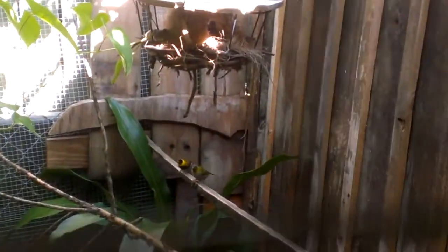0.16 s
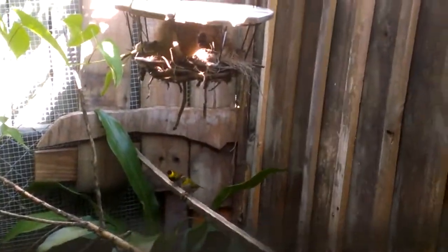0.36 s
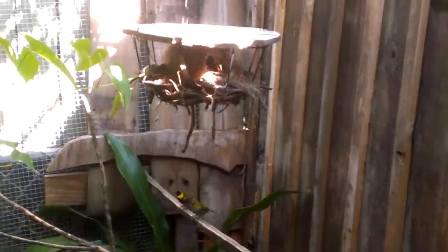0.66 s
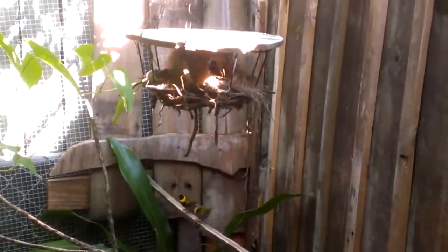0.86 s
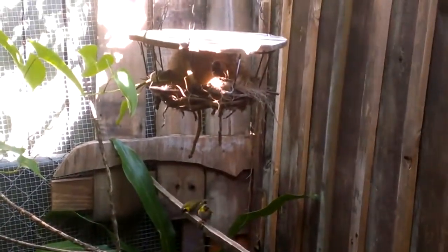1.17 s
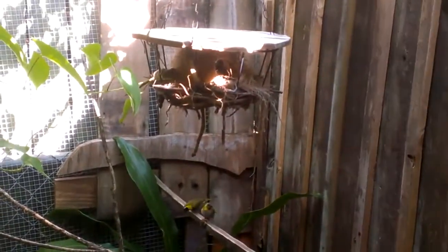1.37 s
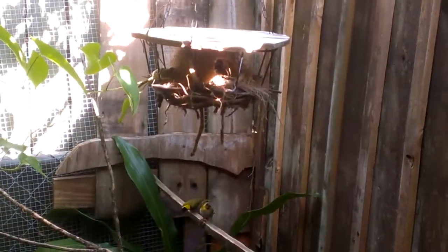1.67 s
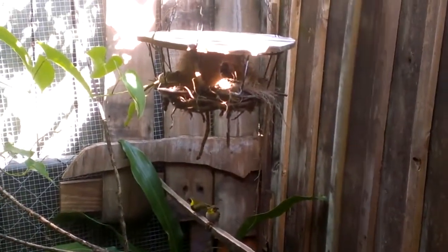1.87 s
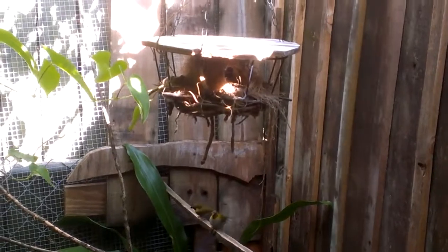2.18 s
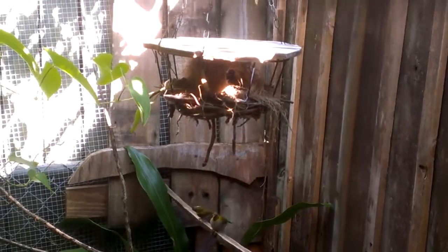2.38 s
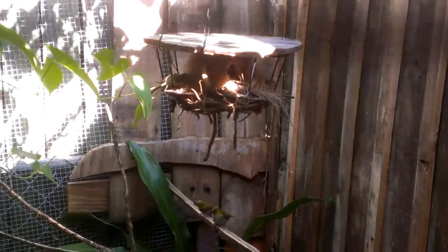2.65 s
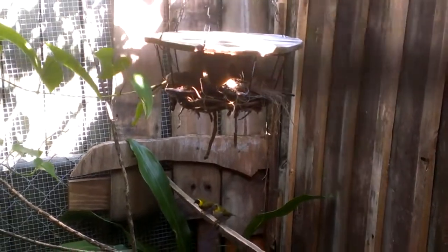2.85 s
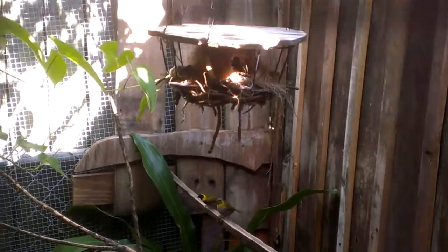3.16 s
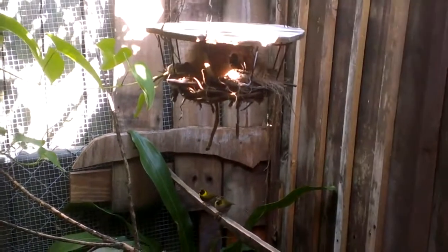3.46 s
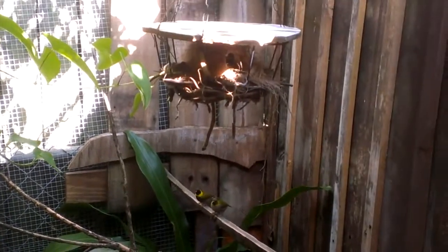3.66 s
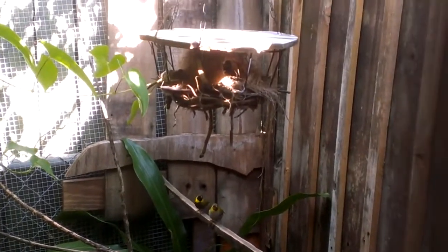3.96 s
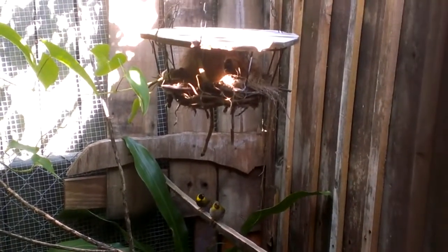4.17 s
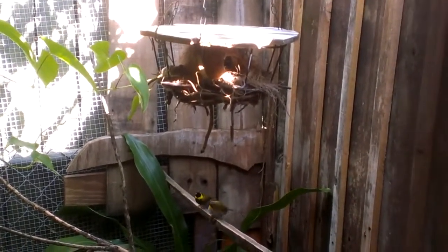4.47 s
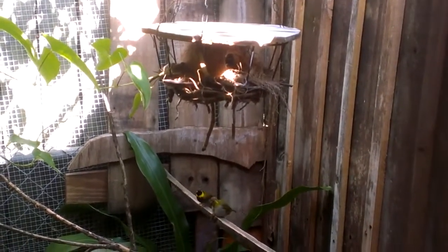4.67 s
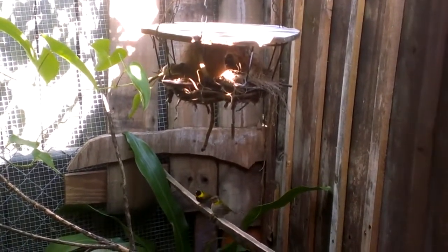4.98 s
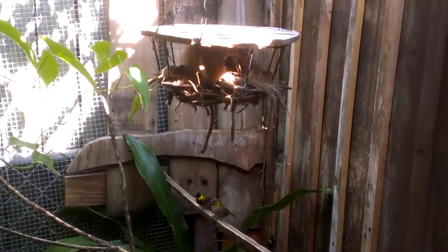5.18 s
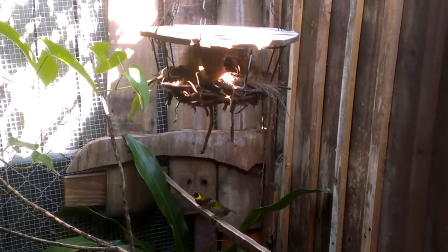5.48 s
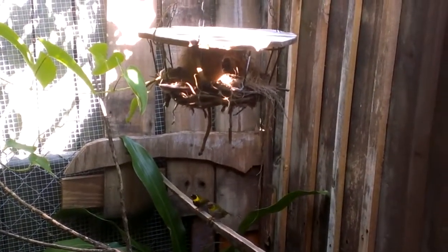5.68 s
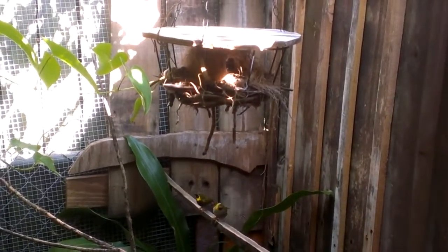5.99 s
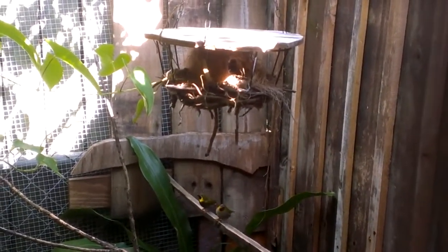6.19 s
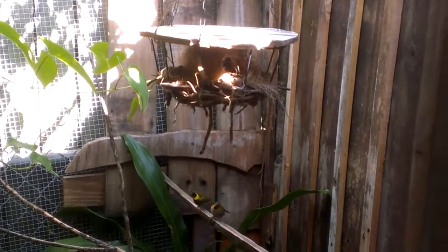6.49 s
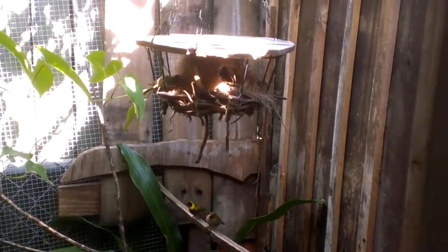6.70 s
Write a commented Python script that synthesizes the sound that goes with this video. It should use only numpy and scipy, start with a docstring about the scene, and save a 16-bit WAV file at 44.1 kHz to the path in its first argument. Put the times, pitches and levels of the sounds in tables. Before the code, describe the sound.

Short bright bird twitters with brief gaps, echoing off nearby planks, with soft rumble, faint hiss and a late dry rustle.

```python
"""In a wooden aviary two small finches twitter, trading short phrases of chips, buzzy rasps and thin whistles.
Each note is a gliding whistle shaken into a buzz, with a faint second voice from the other side of the syrinx
(a bird's voice box). Notes overlap, and plank walls close by answer each one with noisy, fading echoes.
Behind them are a low outdoor rumble, wash and hiss made of shaped noise, a faint wavering hum,
a distant bird of soft falling tones and a few dry brushes of feathers and twigs."""
import sys
import numpy as np
from scipy import signal
from scipy.fft import rfft, irfft, next_fast_len
from scipy.io import wavfile
from scipy.ndimage import map_coordinates

SR = 44100
rng = np.random.default_rng(int(sys.argv[2]) if len(sys.argv) > 2 else 0)


def wav_out(sig):
    """Save sig, one row per channel (or a flat mono array), as 16-bit PCM at SR to the path in sys.argv[1]."""
    wavfile.write(sys.argv[1], SR, np.round(np.clip(np.atleast_2d(sig).T, -1, 1) * 32767).astype(np.int16))


N = 301644  # length of the scene in samples

# How each kind of note moves from start to end, by name of note:
# share of its length, f/Hz, relative level/dB, buzz (0 clear, 1 full, a little more is possible)
NOTE_SHAPES = { "chip": [(0, 8400, -14, 0.7), (.09, 7730, 2, 0.9), (.2, 6510, -7.5, 1.14),
               (.4, 6963, -8.5, 0.9), (.8, 6926, -0.5, 0.6), (1, 6890, -9.5, 0.8)],
               "chirt": [(0, 8500, 3, 0.4), (.2, 6990, -4.5, .9), (.55, 7040, -4.5, 0.8),
               (.85, 7300, -1.5, .6), (1, 7240, -8, .7)], "flick": [(0, 8200, -11, 0.5),
               (.3, 7420, -3, 0.97), (.65, 6850, -3, 1.09), (1, 6500, -7.5, 1)], "pip": [(0, 6200, -2, .2),
               (.25, 6940, -3.5, 0), (.85, 6560, 2, 0), (1, 6550, -15, .1)], "arch": [(0, 8800, -12, .4),
               (.3, 9400, -2, .35), (.55, 8800, -8, .4), (.75, 8000, 0, .7), (1, 8050, 6, 0.96)],
               "peep": [(0, 8500, -6, .25), (.25, 8280, 0, .06), (.8, 8190, -1, .03), (1, 8140, -7, .04)],
               "slur": [(0, 8800, -3, .2), (.2, 7870, 0.5, 0.3), (.45, 7750, -2, 0.7),
               (1, 7520, -7.5, 0.44)], "coo": [(0, 6900, 1, 1.1), (.25, 6200, -7, .3),
               (.6, 6260, -2.5, .08), (.88, 6360, 2, .04), (1, 6220, -8, .15)],
               "whistle": [(0, 6750, -6, .4), (.12, 7140, -2, .12), (.3, 7065, 0, .02), (.7, 7030, 0, .01),
               (.92, 7070, 0, .01), (1, 7060, -5, .02)], "churr": [(0, 7300, -4, 0.9),
               (.35, 6900, 5.5, 0.9), (.75, 5800, -7, 1), (1, 5620, -7, 0.99)], "low": [(0, 4780, -20, .35),
               (.2, 4625, -3, .02), (.48, 4550, 0, 0), (.8, 4590, 0, 0), (.95, 4630, -1, 0),
               (1, 4670, -5, .03)], "long": [(0, 8080, -4, .03), (.2, 7890, -5.5, .02), (.5, 7790, 0, .04),
               (.78, 7750, 3, .12), (.92, 7470, 2.5, .03), (1, 7600, -8.5, .1)],
               "under": [(0, 5290, -18, .04), (.3, 5290, -4, .05), (.65, 5260, -1, .07),
               (.88, 5230, -3.5, .04), (1, 5270, -15.5, .02)], "rasp": [(0, 4300, -12, .8),
               (.1, 4900, -.5, 0.4), (.28, 5150, 3, .6), (.55, 4720, 3.5, 0.5), (.76, 4350, 2, .7),
               (.83, 4000, -1, 1.1), (.865, 2750, -5.5, 1.1), (.9, 3716, -4, 1.1), (.935, 2250, -8, 0.6),
               (1, 1950, -12, 0.1)], "tsk": [(0, 8500, -13.5, 1.3), (.3, 7650, 1, 1.2),
               (.55, 6400, -1, 1.4), (.75, 4950, -4, .5), (1, 4750, -6, .3)], "seep": [(0, 7800, -4.5, .15),
               (.4, 7270, -7.5, 0.3), (.85, 7020, -5.5, .1), (1, 7200, -14.5, 0)], }


def amp(db):
    """Turn decibels into a plain factor."""
    return 10 ** (np.asarray(db) / 20)


def unit(x):
    """Scale to an rms (average strength) of 1."""
    return x / np.sqrt(np.mean(x ** 2) + 1e-20)


def along(points, hz):
    """Read a curve of (f/Hz, value) points on a log frequency axis."""
    f, values = np.transpose(points)
    return np.interp(np.log(hz + 1), np.log(f + 1), values)


def wobble(rate, size):
    """A smooth random curve through rate random points a second."""
    knots = rng.standard_normal(1024)
    return map_coordinates(knots, [np.arange(size) * rate / SR], mode="wrap")


def filtered(x, response):
    """Strengthen or weaken each frequency of x by response(hz)."""
    padded = next_fast_len(N + SR // 2)
    hz = np.fft.rfftfreq(padded, 1 / SR)
    return irfft(rfft(x, padded) * response(hz), padded)[..., :N]


def add(track, s, sound):
    """Mix a sound into the track at s seconds, cutting it where the track ends."""
    start = max(0, round(s * SR))
    part = track[..., start:start + sound.shape[-1]]
    part += sound[..., :part.shape[-1]]


def rush(spectrum):
    """Stereo noise of rms 1 with the given spectrum, nearly mono in the bass and wide in the treble."""
    # How alike left and right are: f/Hz, likeness (1 is the same)
    likeness = [(60, 1), (160, 0.98), (350, .9), (700, 0.69), (1500, 0.33), (6000, 0.17)]

    def mid_and_side(hz):
        # This angle shares the energy between what both sides have in common and what differs.
        turn = np.arccos(np.clip(along(likeness, hz), -1, 1)) / 2
        return amp(along(spectrum, hz)) * [np.cos(turn), np.sin(turn)]

    mid, side = filtered(rng.standard_normal((2, N)), mid_and_side)
    return unit(np.array([mid + side, mid - side]))


def echoes(t60, gap):
    """A noisy stereo tail of energy 1: it builds up over gap seconds and falls by 60 dB in t60 seconds."""
    t = np.arange(SR // 3) / SR
    decay = amp(-60 * t / t60)
    build_up = 1 - np.exp(-(t / gap) ** 2)
    tail = rng.standard_normal((2, len(t))) * decay * build_up
    return tail / np.linalg.norm(tail, axis=1, keepdims=True)


def song_notes():
    """List every note sung (note, t/s, length/s, level/dB, left-right/dB, effort/dB); buzzes need more effort."""
    # Single calls and scraps of song: note, t/s, length/s, level/dB, left-right/dB
    lone_notes = [ ("chip", 0, .019, -21.5, 1.7), ("chip", .299, .026, -21, 1),
                  ("seep", .507, .018, -35, -1.3), ("chip", 1.161, .029, -28.5, -2.4),
                  ("tsk", 1.744, .013, -29, 1), ("chip", 2.521, .026, -22.5, 2.4),
                  ("chip", 3.993, .029, -32, 0), ("flick", 4.062, .024, -44, -1),
                  ("arch", 4.066, .028, -42, -.6), ("pip", 4.082, .015, -43, -2.3),
                  ("seep", 4.812, .022, -22, .6), ("chip", 5.153, .021, -21, 1),
                  ("peep", 5.487, .042, -25.5, -11.5), ("rasp", 5.526, .12, -33.5, 1.5),
                  ("tsk", 6.258, .014, -31.5, 1), ]
    # The three phrases by name, each a fixed run of notes before stretch, effort and turn:
    # note, delay/s, length/s, level/dB, left-right/dB
    motifs = { "twirl": [("flick", 0, .022, -23.8, -.5), ("pip", .028, .016, -20.3, 1),
              ("arch", .03, .042, -32, .5), ("peep", .078, .033, -22.7, 1.5), ("rasp", .118, .12, -23, .3)],
              "lilt": [("chirt", 0, .03, -22.3, 1), ("slur", .049, .03, -26, 0),
              ("coo", .057, .041, -22, 0), ("whistle", .102, .067, -22.7, -1.2)],
              "drawl": [("tsk", 0, .017, -30.3, 1), ("chirt", .052, .028, -26.5, 2.5),
              ("churr", .087, .056, -29, 2), ("peep", .133, .028, -26, -5), ("low", .157, .102, -21.7, 3.2),
              ("long", .262, .142, -27.6, -1.3), ("under", .275, .1, -30.5, 5.5)], }
    # When the phrases are sung: phrase, t/s, effort/dB, added left-right/dB, stretch (times the usual length)
    phrases = [ ("twirl", .372, 0, 0, 1.01), ("lilt", .678, 0, -.5, .99), ("drawl", .694, 0, -1, .97),
               ("twirl", 1.244, -5.8, -1, 1.001), ("lilt", 1.553, -4.3, -2, 1.05),
               ("twirl", 2.624, -.7, .3, 1.001), ("lilt", 2.925, -.5, 0, .995),
               ("drawl", 3.077, -.3, 1.5, 1.015), ("drawl", 5.083, 0, -.5, .995),
               ("twirl", 5.263, -1.5, .7, .995), ("lilt", 5.56, 1, 2.5, .98),
               ("lilt", 5.757, -6, -3.5, 1.03), ]
    full_voice_db = -24  # a lone note below this level is sung with less effort
    clear_follows, buzz_follows = .5, .9  # dB per dB of effort: for a clear note, and added at full buzz

    notes = []
    for kind, s, length, db, pan_db in lone_notes:
        notes.append((kind, s, length, db, pan_db, min(0, db - full_voice_db)))
    for motif, start, effort_db, turn_db, stretch in phrases:
        for kind, delay, length, db, pan_db in motifs[motif]:
            buzz = np.mean(NOTE_SHAPES[kind], axis=0)[3]
            level_db = db + effort_db * (clear_follows + buzz_follows * buzz)
            notes.append((kind, start + stretch * delay, stretch * length, level_db, pan_db + turn_db, effort_db))
    return notes


def syrinx(shape, length, band_hz, buzz_hz, onset, octave_db, second_db,
           swing_hz=640, throb=.7, scatter_hz=270, breath_db=-21, interval=1.275):
    """One note: a gliding whistle whose pitch and strength a fast flutter shakes into a buzz."""
    splatter_db, splatter_width_hz = -29, 4200  # broad hiss that buzz throws around the pitch
    size = int(max(length, .005) * SR)
    t = np.arange(size) / SR
    share, *columns = np.transpose(shape)
    pitch, level_db, buzz = [np.interp(t / t[-1], np.sort(share), c) for c in columns]
    buzz = np.clip(buzz, 0, 1.5)

    flutter_hz = buzz_hz * (1 + .13 * wobble(200, size))
    flutter = 2 * np.pi * (np.cumsum(flutter_hz) / SR + rng.random())
    shake_hz = buzz * (swing_hz * np.sin(flutter) + scatter_hz * wobble(1500, size))
    shake_hz += 12 * wobble(150, size)  # even a clear note is slightly unsteady

    # The shake is a complex signal: its size is the strength, its angle moves the pitch.
    shake = np.exp(throb * buzz * np.cos(flutter) + 2j * np.pi * np.cumsum(shake_hz) / SR)
    breath = wobble(4500, size) + 1j * wobble(4100, size)
    shake += amp(breath_db) * (buzz + 0.11) * breath
    # The throat follows the pitch and passes only a band around it.
    throat = signal.butter(2, band_hz, fs=SR, output="sos")
    shake = signal.sosfiltfilt(throat, shake)
    splatter = wobble(splatter_width_hz, size) + 1j * wobble(splatter_width_hz, size)
    height = np.clip(pitch / 7000, 0, 1) ** 3  # high notes splatter most
    shake += amp(splatter_db) * buzz * splatter * height

    phase = 2 * np.pi * np.cumsum(pitch) / SR
    tone = shake * np.exp(1j * phase)
    octave = amp(octave_db) * tone ** 2  # squaring doubles the pitch
    # The other side of the syrinx joins in faintly, a fixed interval higher.
    second = amp(second_db) * shake * np.exp(1j * interval * phase)
    ramp = np.minimum(t / onset, (t[-1] - t) / .003)  # the release takes 3 ms
    edges = np.sin(np.pi / 2 * np.clip(ramp, 0, 1)) ** 2
    return unit((tone + second + octave).real * amp(level_db) * edges)


def aviary(note, planks_db, planks_t60, hall_db, hall_t60):
    """The note as it arrives: direct sound, a quick rattle of echoes off the planks and a faint longer tail."""
    planks = amp(planks_db) * echoes(planks_t60, gap=0.0038)
    hall = amp(hall_db) * echoes(hall_t60, gap=.015)
    response = planks + hall
    response[:, 0] += 1  # the direct sound
    heard = signal.fftconvolve(note[None], response, axes=1)
    # Echoes spread the note out but leave its total energy the same.
    return heard * np.linalg.norm(note) / np.linalg.norm(heard, axis=1, keepdims=True)


def finches(fade=.1):
    """The finches' song: the birds turn and hop, so every note meets the walls differently."""
    # The voice by name of note: throat band to either side of the pitch f/Hz, flutter f/Hz, onset t/s,
    # octave level/dB, second voice level/dB
    voices = { "chip": (1400, 390, .013, -60, -22), "chirt": (1400, 300, .01, -59.5, -28),
              "flick": (1800, 420, .009, -60, -27), "pip": (1300, 350, 0.004, -58, -30.5),
              "arch": (1300, 580, .004, -64.5, -57), "peep": (1100, 340, 0.0033, -59, -46.5),
              "slur": (1400, 480, 0.0021, -55.5, -46), "coo": (600, 350, .004, -60, -35),
              "whistle": (1200, 300, 0.0029, -66.5, -25), "churr": (1400, 520, .006, -61, -22),
              "low": (600, 260, .012, -50.5, -58), "long": (770, 280, .006, -53.5, -42),
              "under": (500, 330, .012, -25.5, -57.5), "rasp": (950, 345, 0.0021, -42, -37),
              "tsk": (1600, 600, .004, -46.5, -29.5), "seep": (900, 330, .005, -57.5, -26.5), }
    song = np.zeros((2, N))
    for kind, s, length, db, pan_db, effort_db in song_notes():
        # Sung softly, a note loses its weak parts first.
        contrast = 1 - fade * effort_db
        shape = np.array(NOTE_SHAPES[kind]) * [1, 1, contrast, 1]
        note = syrinx(shape, length, *voices[kind])
        heard = aviary(note, planks_db=-0.5, planks_t60=.078, hall_db=-30, hall_t60=.27)
        sides = unit(amp([[pan_db / 2], [-pan_db / 2]]))
        add(song, s, amp(db) * sides * heard)
    return song


def outdoors(hum_hz=59.0, hum_db=-56, air_db=-71, rumble_trim_db=-.9, wash_trim_db=1.1,
             rumble_flutter_db=2.3, wash_flutter_db=1.7):
    """Shaped noise as a swelling rumble with dull bumps, a wash and thin steady hiss, plus a wavering low hum."""
    # Slow swell of the background, before the trims: t/s, rumble level/dB, level of the murky wash/dB
    swell = [(0.0, -46.4, -53.5), (0.64, -43.6, -51.4), (0.84, -48.4, -55.1), (1.58, -41.8, -50.4),
             (2.18, -54.8, -59.4), (2.74, -43.7, -51.0), (3.08, -43.4, -55.8), (3.16, -44.0, -49.3),
             (3.6, -49.3, -55.9), (4.08, -41.6, -50.6), (4.16, -52.5, -54.4), (4.66, -52.1, -57.8),
             (4.82, -37.4, -50.7), (5.04, -52.8, -58.4), (5.1, -46.2, -48.6), (5.68, -48.9, -54.6),
             (5.92, -39.3, -46.7), (6.16, -57.4, -56.5), (6.28, -44.6, -49.2), (6.82, -46.6, -49.8)]
    # Dull bumps in the rumble: t/s, level/dB
    bump_list = [(.26, -41), (1.07, -42), (1.46, -35.5), (2.34, -45), (2.74, -36.5), (3.4, -42),
                 (6.66, -41)]
    # Spectra of the rumble, the wash and the hiss of the air: f/Hz, relative level per Hz/dB
    rumble_colour = [(18, -54), (30, -27), (40, -11.5), (57, 2.5), (75, -1), (100, -4), (122, -0.5),
                     (146, -9.5), (180, -17), (240, -42)]
    wash_colour = [(82, -38), (140, -8), (246, 0.5), (345, -12), (400, -11.5), (608, -11.5), (744, -13),
                   (1330, -20.5), (1480, -22), (2310, -24), (3500, -38.5), (4550, -70.5), (7700, -120)]
    air_colour = [(1000, -24.5), (2200, 5), (3600, -1.5), (7000, -7.5), (10300, -5), (11000, -17.5)]
    bump_s = .035  # each bump rises and falls over about this long

    t = np.arange(N) / SR
    s, *columns = np.transpose(swell)
    rumble_db, wash_db = [np.interp(t, s, c) for c in columns]
    hum_phase = 2 * np.pi * np.cumsum(hum_hz + 1.2 * wobble(4, N)) / SR
    hum = unit(np.sin(hum_phase) * amp(3.9 * wobble(2.8, N)))
    flutter = wobble(20, N)  # quick unevenness that rumble and wash share
    bumps = sum(amp(db) * np.exp(-((t - at) / bump_s) ** 2) for at, db in bump_list)
    swelling = amp(rumble_db + rumble_trim_db + rumble_flutter_db * flutter)
    rumble = np.hypot(swelling, bumps) * rush(rumble_colour)
    wash = amp(wash_db + wash_trim_db + wash_flutter_db * flutter) * rush(wash_colour)
    return rumble + wash + amp(hum_db) * hum + amp(air_db) * rush(air_colour)


def far_bird(length=0.11, fall=0.1, t60=.22, rough_hz=130, count=12):
    """Soft, sinking tones from far away, slightly hoarse from a random pitch wobble and heard only as echo."""
    # The clearest falling notes: t/s, middle pitch f/Hz, level/dB
    clear_calls = [(.13, 2453, -60), (.94, 2460, -63.5), (1.255, 3340, -60.5), (1.35, 2320, -57.5),
                   (3.67, 2490, -62.5), (3.77, 2276, -63.5), (4.06, 2400, -67), (4.48, 2635, -67),
                   (4.6, 2230, -66), (5.0, 2370, -62)]
    chatter_hz, chatter_db, spread = 2550, -70, .08  # fainter notes; spread is the pitch scatter as a share

    calls, size = np.zeros((2, N)), int(length * SR)
    chatter = []
    for k, (when, high) in enumerate(rng.random((count, 2))):
        s = (k + when) * N / SR / count  # one at a random moment in each equal slot
        chatter.append((s, chatter_hz * (1 + spread * (2 * high - 1)), chatter_db))
    for s, hz, db in clear_calls + chatter:
        glide = hz * (1 + fall * np.linspace(.5, -.5, size))
        pitch = glide + rough_hz * wobble(520, size)
        note = unit(np.sin(2 * np.pi * np.cumsum(pitch) / SR) * signal.windows.tukey(size, .5))
        add(calls, s, amp(db) * signal.fftconvolve(note[None], echoes(t60, gap=0.0021), axes=1))
    return calls


def rustles(rise=.006):
    """Short dry brushes of feathers and twigs: noise that starts quickly and dies away."""
    # The brushes: t/s, level/dB, time to fall by 60 dB t/s
    brushes = [(.183, -60.5, .12), (2.14, -61, .45), (6.279, -37.5, 0.25)]
    # Spectrum of a brush: f/Hz, relative level per Hz/dB
    twig_colour = [(1500, -12), (2800, -2.5), (4400, -6), (5000, 9), (5600, -6), (8500, 3.5), (10500, -11)]
    sound, t = np.zeros((2, N)), np.arange(SR // 2) / SR
    for s, db, t60 in brushes:
        strength = amp(db - 60 * t / t60) * (1 - np.exp(-t / rise))
        add(sound, s, strength * rush(twig_colour)[:, :len(t)])
    return sound


def scene():
    """All the sounds together, with the outdoors slightly stronger on the right."""
    balance = amp([[-.4], [.4]])
    return finches() + outdoors() * balance + far_bird() + rustles()


def record(dry):
    """A very steep cut of the treble: almost nothing is left above the band limit."""
    top_hz = 10830
    return filtered(dry, lambda hz: 1 / np.sqrt(1 + (hz / top_hz) ** 160))


dry = scene()
out = record(dry)
wav_out(out)
```